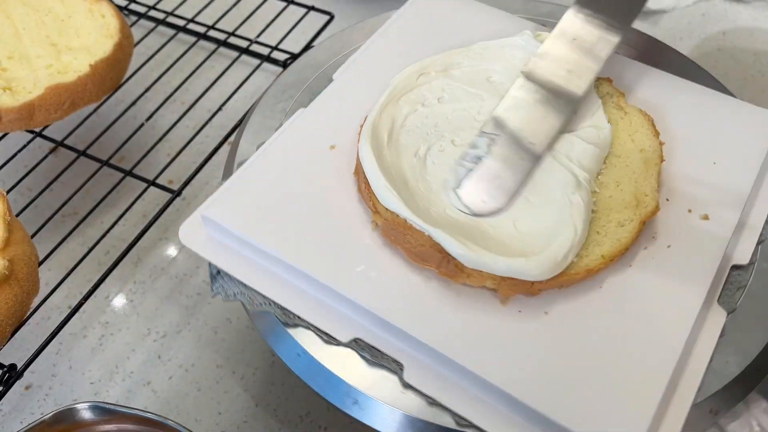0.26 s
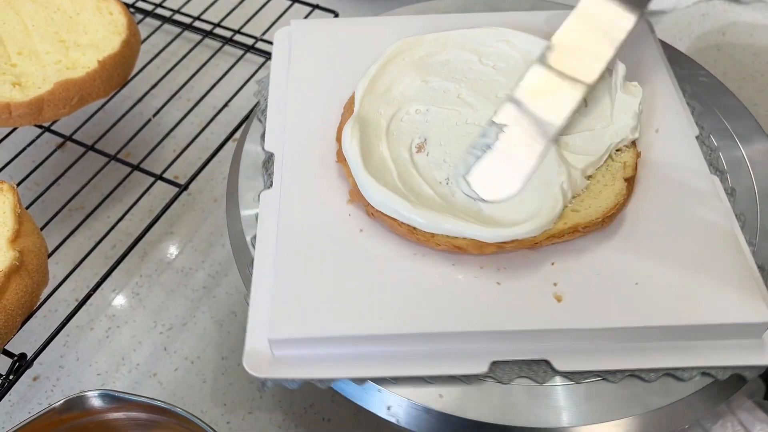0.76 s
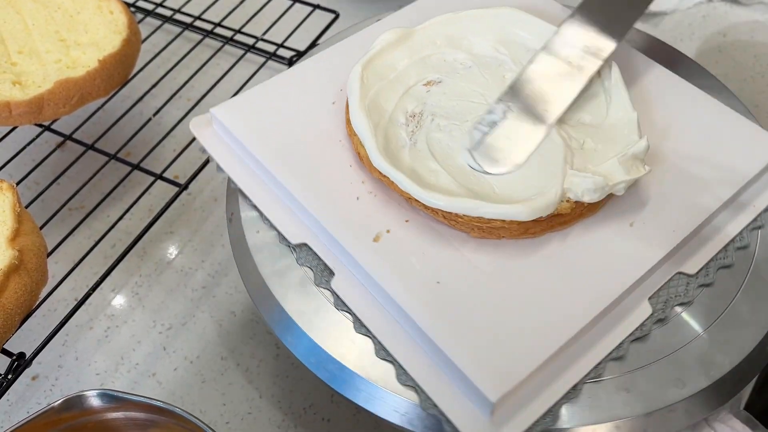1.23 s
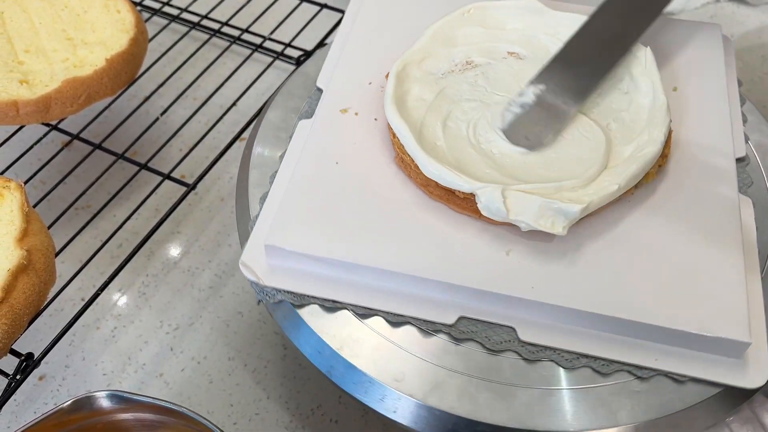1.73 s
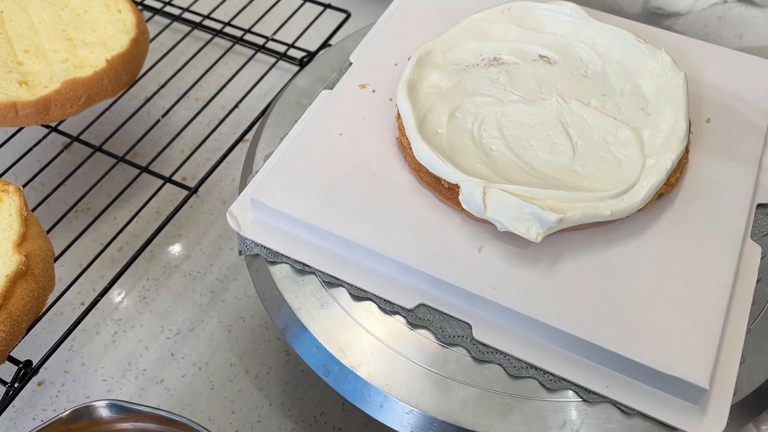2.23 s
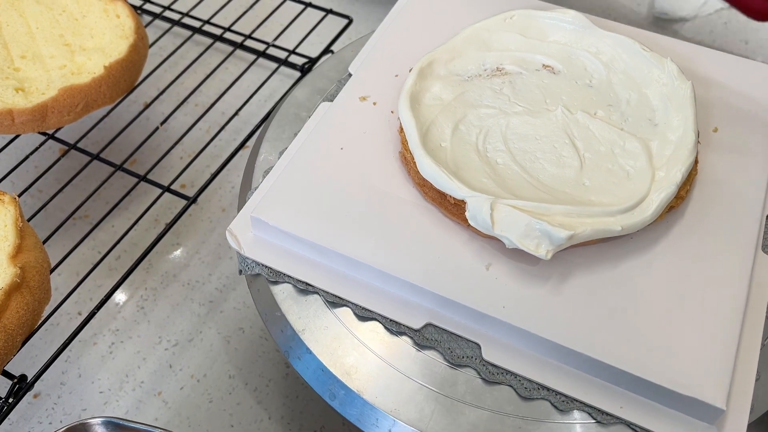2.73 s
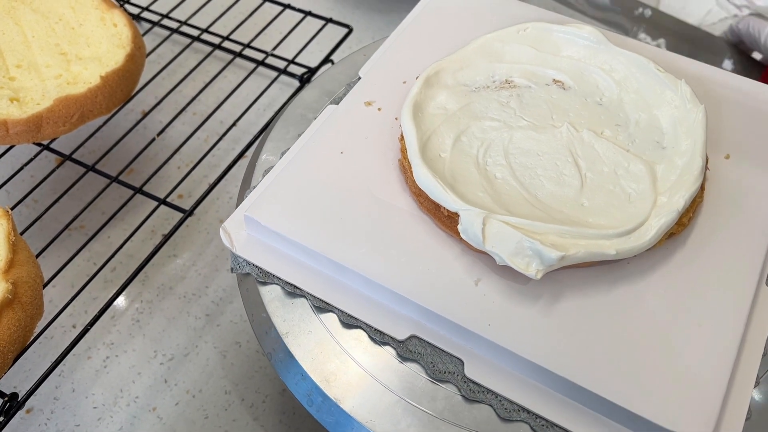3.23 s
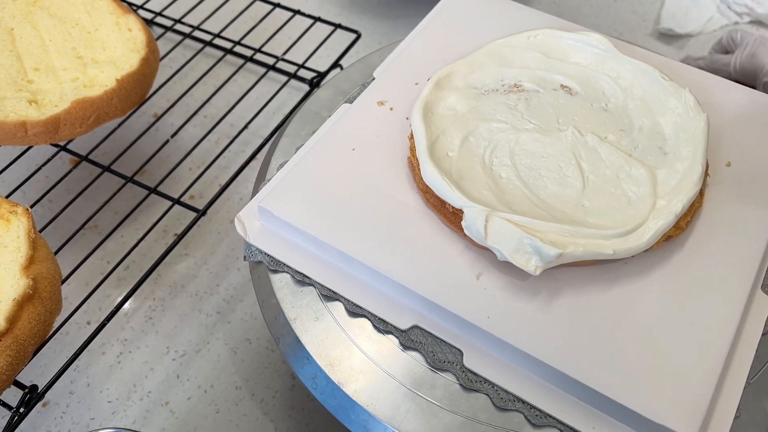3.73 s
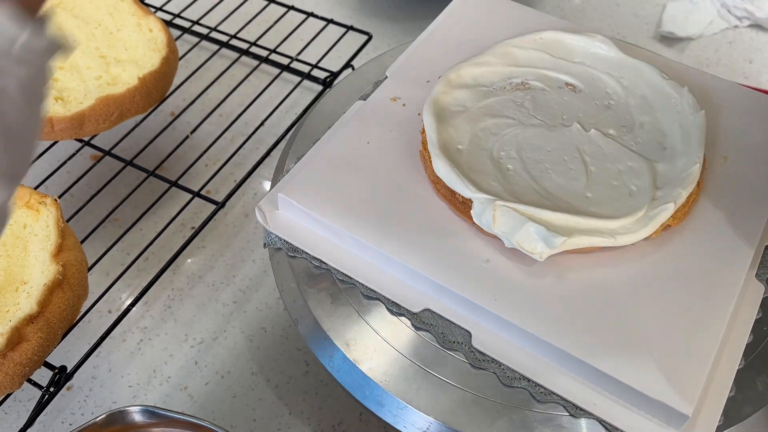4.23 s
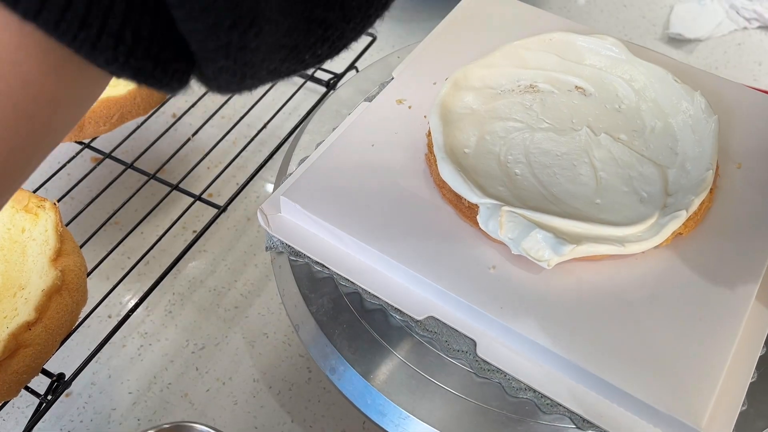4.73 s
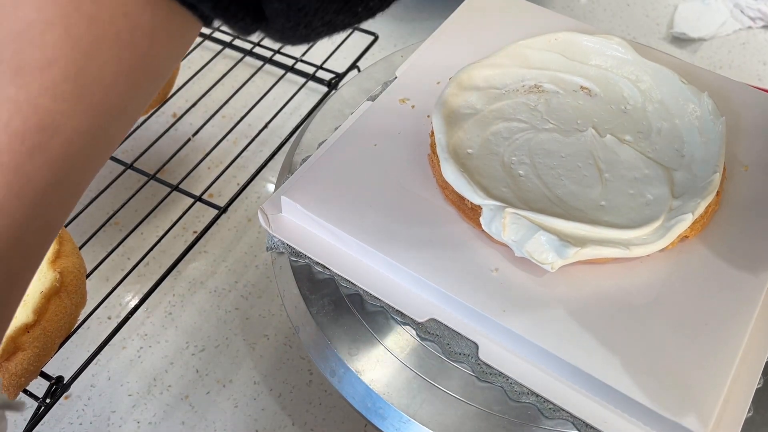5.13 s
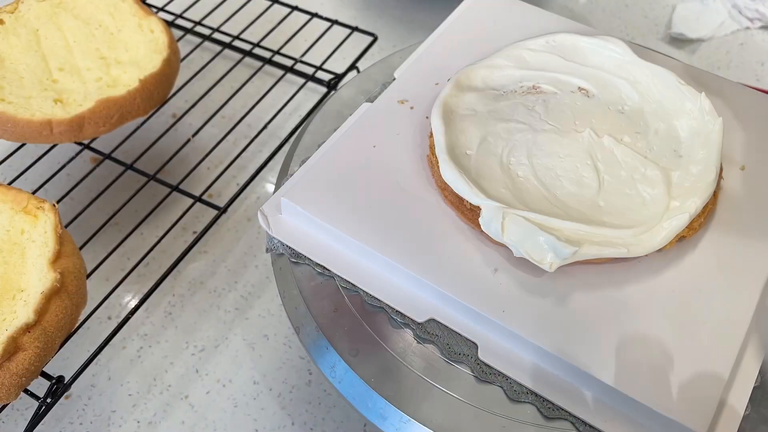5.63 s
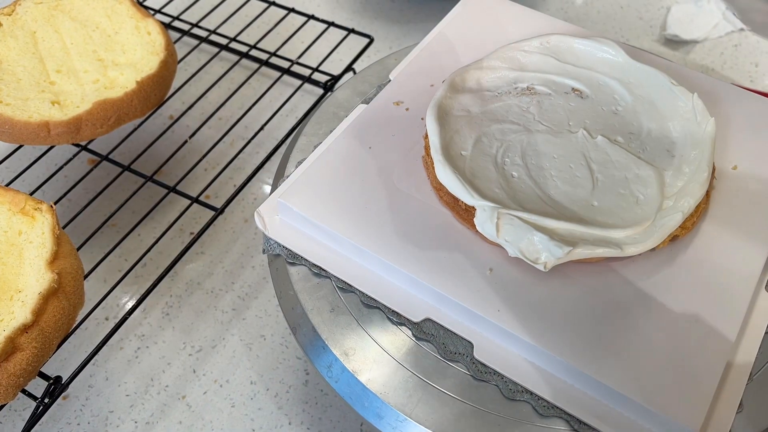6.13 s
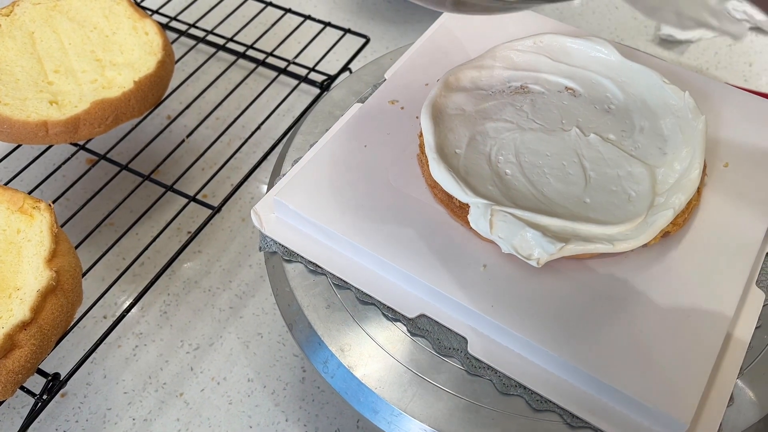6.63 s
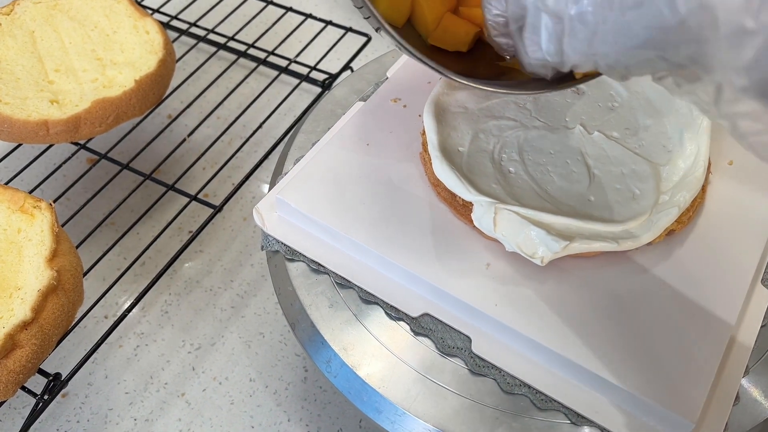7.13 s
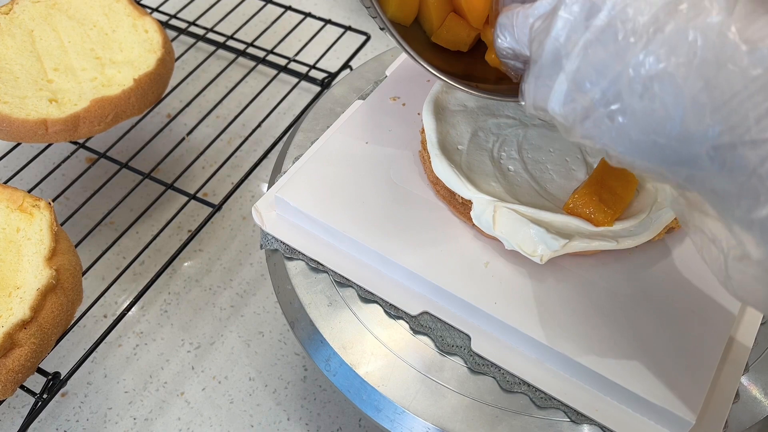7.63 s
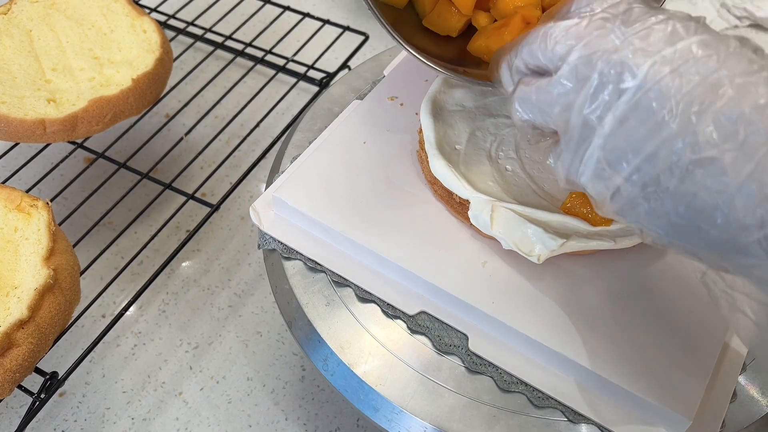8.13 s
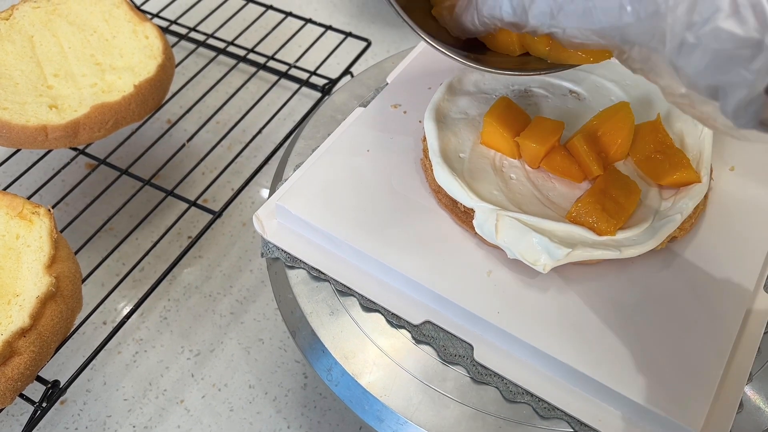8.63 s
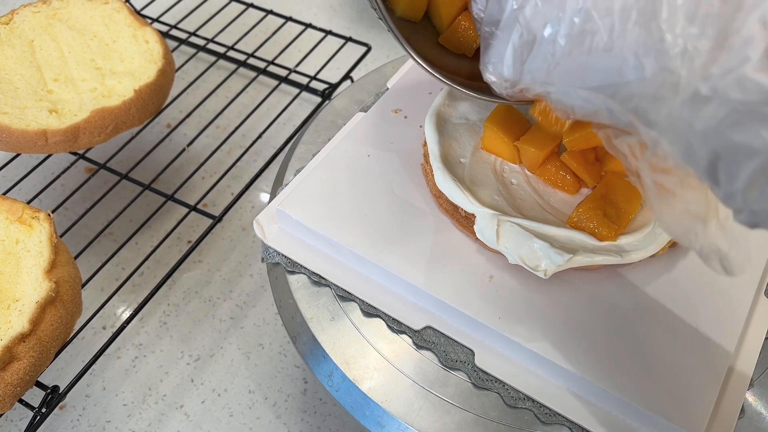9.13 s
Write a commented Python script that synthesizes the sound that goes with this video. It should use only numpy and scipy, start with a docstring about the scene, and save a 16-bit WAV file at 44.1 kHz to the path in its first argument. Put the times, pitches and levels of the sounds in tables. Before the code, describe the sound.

Close stereo microphone at a worktop, slight room and faint hiss. Rhythmic wet cream smearing comes first, then a solid counter thump, brief steel slide, bowl clank and knife clatter with skin rubbing. Small ticks, a cloth swish and dull movement rumble lead into sharp plastic film crinkling, strongest at first, then steady and finer as the gloved hand lays soft fruit on cream, with a late light clack on the bowl.

```python
"""A palette knife smears cream on a cake layer in a small kitchen: bubbly noise grains follow the pressure.
Bowl and knife are put down with knocks, contact noise over decaying modes, and a sleeve swishes past the microphone.
Then a thin plastic glove crinkles in dense random snaps as it lays soft fruit on the cream.
A close pair of microphone ports hears this with a little room, over dull movement rumble and faint hiss."""
import sys
import numpy as np
from scipy import signal
from scipy.fft import rfft, irfft, next_fast_len
from scipy.io import wavfile
from scipy.ndimage import map_coordinates

SR = 44100
rng = np.random.default_rng(int(sys.argv[2]) if len(sys.argv) > 2 else 0)


def to_wav(s):
    """Save 16-bit WAV."""
    ch = np.atleast_2d(s).T  # columns
    pcm = np.round(np.clip(ch, -1, 1) * 32767)  # PCM
    wavfile.write(sys.argv[1], SR, pcm.astype(np.int16))


N = 413658

# ringing modes of the counter: frequency_hz, relative level_db, t60_s
COUNTER_MODES = [(98, -4, 0.19), (161, 5, 0.19), (228, -0.5, 0.19), (277, -1, 0.16), (340, -13, 0.15),
                 (433, -11, 0.087), (485, -7, 0.073), (780, -17, 0.26), (906, -31, 0.15), (1972, -22, 0.28),
                 (4080, -18, 0.39)]
# colour of small hard contacts: frequency_hz, relative density_db (per Hz)
TICK_COLOUR = [(150, -14), (550, 2), (1500, -38), (2200, -2.5), (2900, 4), (4000, 10.5), (5000, 0),
               (6700, 12.5), (8300, 12), (12000, 6.5), (15800, 3)]


def amp(db):
    """Decibels to linear gain."""
    return 10 ** (np.asarray(db) / 20)


def rms(x):
    """Root mean square, kept above zero."""
    return np.sqrt(np.mean(x ** 2) + 1e-20)


def along(points, hz):
    """Interpolate (Hz, value) points on a log frequency axis."""
    f, v = np.transpose(points)
    return np.interp(np.log(hz + 1), np.log(f + 1), v)


def gains(rows):
    """One gain per sample for each dB column, fading out within 30 ms beyond the rows."""
    s, *cols = np.transpose(rows)
    t = np.arange(N) / SR
    gate = np.interp(t, [s[0] - .03, s[0], s[-1], s[-1] + .03], [0, 1, 1, 0])
    return [gate * amp(np.interp(t, s, c)) for c in cols]


def wobble(rate):
    """A random curve of straight segments, rate knots a second."""
    knots = rng.standard_normal(int(N * rate / SR) + 4)
    return map_coordinates(knots, [np.arange(N) * rate / SR], order=1)


def filtered(x, response):
    """Multiply the spectrum of x by a complex response of frequency."""
    n = x.shape[-1]
    m = next_fast_len(n + 8192, True)
    return irfft(rfft(x, m) * response(np.fft.rfftfreq(m, 1 / SR)), m)[..., :n]


def coloured(x, spectrum, size=2048):
    """Pass x through the causal filter of a spectrum, keeping the power of white noise."""
    # folding the cepstrum onto positive times gives minimum phase
    cepstrum = irfft(np.log(amp(along(spectrum, np.fft.rfftfreq(size, 1 / SR)))))
    cepstrum[1:size // 2] *= 2
    cepstrum[size // 2 + 1:] = 0
    response = irfft(np.exp(rfft(cepstrum)))
    return signal.oaconvolve(x, response / np.linalg.norm(response))[:len(x)]


def split(x, edge_hz):
    """The parts of x below and above an edge."""
    low = filtered(x, lambda hz: 1 / (1 + (hz / edge_hz) ** 4))
    return low, x - low


def add(track, s, sound):
    """Mix a sound into the track at time s."""
    part = track[max(round(s * SR), 0):][:len(sound)]
    part += sound[:len(part)]


def grains(rate, spread_db, clump_db, rub):
    """Tiny flicks of uneven size that come in clumps, over a share of smooth rubbing noise."""
    sizes = amp(spread_db * np.minimum(rng.exponential(size=N), 4))
    flicks = (rng.random(N) < rate / SR) * rng.choice([-1, 1], N) * sizes
    clumps = amp(clump_db * (wobble(250) + wobble(60)) / 2)
    x = (flicks / rms(flicks) + rub * rng.standard_normal(N)) * clumps
    return x / rms(x)


def crackle(rate, spread_db, t60):
    """Sparse ticks of uneven size, each a brief burst of decaying noise."""
    sizes = amp(spread_db * np.minimum(rng.exponential(size=N), 2.5))
    onsets = (rng.random(N) < rate / SR) * sizes
    decay = signal.lfilter([1], [1, -amp(-60 / t60 / SR)], onsets)
    return decay * rng.standard_normal(N) / 2


def patchy(x, depth_db, width_hz, life):
    """The colour shifts from moment to moment as different folds and spots sound."""
    z = signal.stft(x, nperseg=256)[2]
    across = np.arange(z.shape[0]) * SR / 256 / width_hz
    onward = np.arange(z.shape[1]) * 128 / SR / life
    where = np.meshgrid(across, onward, indexing="ij")
    field = map_coordinates(rng.standard_normal((128, 2048)), where, order=1, mode="mirror")
    return signal.istft(z * amp(depth_db * field), nperseg=256)[1][:N]


def strokes(rows, attack, slope_db, t60):
    """Gain of rubbing strokes: each rises, drifts by slope_db a second while it lasts, and dies away."""
    track, t = np.zeros(N), np.arange(SR) / SR
    for s, length, db in rows:
        drift = slope_db * np.minimum(t, length)
        release = 60 * np.maximum(t - length, 0) / t60
        add(track, s, np.minimum(t / attack, 1) * amp(db + drift - release))
    return track


def rustle(body, top, drive, spectrum, edge_hz, low_db, high_db):
    """Grains in a material's colour, with one gain for its body and one for its fine top."""
    low, high = split(coloured(drive, spectrum), edge_hz)
    return amp(low_db) * body * low / rms(low) + amp(high_db) * top * high / rms(high)


def snaps(rows, spectrum, rise, t60, after_db, after_t60, low_db):
    """Each snap is a noise burst with a quick and a slow decay; a third column shifts its low part."""
    track, t = np.zeros(N), np.arange(SR // 8) / SR
    shape = (1 - np.exp(-t / rise)) * (amp(-60 * t / t60) + amp(after_db - 60 * t / after_t60))
    for s, db, *body_db in rows:
        low, high = split(coloured(rng.standard_normal(len(t)) * shape, spectrum), 2400)
        snap = amp(sum(body_db) + low_db) * low / rms(low) + high / rms(high)
        add(track, s, amp(db) * snap / np.abs(snap).max())
    return track


def struck(blows, modes, colour, contact_t60, ring_db, trim_db, crack_db, push_db):
    """A thing scrapes into contact, takes a push, cracks, thuds in its dense resonances and rings in its modes."""
    crack_t60 = 0.011  # seconds
    track, lead = np.zeros(N), SR // 16
    t = np.arange(-lead, SR // 2) / SR
    after = np.maximum(t, 0)
    for s, db, lead_in in blows:
        scrape_and_thud = np.exp(np.minimum(t, 0) / lead_in) * amp(-60 * after / contact_t60)
        crack = (t >= 0) * amp(crack_db - 60 * after / crack_t60)
        shape = scrape_and_thud + crack
        push = (t == 0) * amp(push_db) * np.linalg.norm(shape)
        contact = coloured(rng.standard_normal(len(t)) * shape + push, colour)
        ring = np.zeros(len(t))
        for k, (hz, level, t60) in enumerate(modes):
            decay = amp(level + rng.normal(0, 1) - 60 * after / t60)
            ring += (-1) ** k * decay * np.sin(2 * np.pi * hz * after + rng.normal(0, 1.0))
        ring *= 1 - np.exp(-after / 0.0015)
        blow = contact * rms(shape) / rms(contact) + amp(ring_db) * ring
        add(track, s - lead / SR, amp(db + trim_db) * blow)
    return track


def background():
    """Dull movement rumble, brighter when the cook is brisk, over the faint hiss of the room."""
    # rumble of the cook's movements: time_s, level_db (before trim)
    rumble = [(0.0, -80), (0.8, -86), (1.2, -77), (1.9, -81), (2.7, -78), (3.5, -76), (3.97, -73.5),
              (4.2, -72), (4.6, -70), (5.0, -74), (5.17, -75), (5.4, -75), (5.58, -77), (5.65, -67),
              (5.75, -74), (5.93, -75), (6.08, -69), (6.25, -74), (6.45, -85), (6.9, -91), (7.4, -86),
              (7.58, -76), (7.75, -86), (8.1, -87), (8.55, -81), (9.38, -88)]
    # colour of the movements: frequency_hz, relative density_db (per Hz)
    shuffle_colour = [(20, -3), (50, 8), (110, -0.5), (200, -6), (400, -15), (700, -24.5), (1500, -27.5)]
    # colour of the hiss: frequency_hz, relative density_db (per Hz)
    hiss_colour = [(30, -15), (150, -6), (500, -14.5), (1500, -9.5), (4000, -10.5), (9000, -16),
                   (15800, -30)]
    motion, = gains(rumble)
    brushing = motion.max() * (motion / motion.max()) ** 2.27  # the top grows faster than the body
    sway = rng.standard_normal(N) * amp(3.2 * wobble(22))
    shuffle = rustle(motion, brushing, sway, shuffle_colour, edge_hz=140, low_db=-0.5, high_db=2.5)
    hiss = np.array([coloured(rng.standard_normal(N), hiss_colour) for side in range(2)])
    return shuffle + amp(-71.5) * hiss


def scatter(x, t60, size):
    """Dying reflections, separate at each port; their pattern is new every size samples."""
    padded = np.pad(x, (size, 2 * size))
    frames = np.lib.stride_tricks.sliding_window_view(padded, 2 * size)[::size]
    t = np.arange(2 * size) / SR
    decay = amp(-60 * t / t60) * (1 - np.exp(-t / 0.0027))
    tails = rng.standard_normal((2, len(frames), 2 * size)) * decay / np.linalg.norm(decay)
    windowed = frames * signal.windows.cosine(2 * size)
    heard = irfft(rfft(windowed, 4 * size) * rfft(tails, 4 * size))
    # overlap-add the frames
    at = np.arange(len(frames))[:, None] * size + np.arange(heard.shape[-1])
    return np.array([np.bincount(at.ravel(), port.ravel())[size:size + N] for port in heard])


def kitchen(rustles, knocks, ticks, near_t60, room_t60, room_db):
    """Direct sound, quick scatter off counter and dishes, and a room tail that the close ticks hardly reach."""
    # power that reaches the ports directly: frequency_hz, share (fraction, limited to .05 to .98)
    direct_share = [(100, .97), (300, .85), (800, .5), (2000, .4), (4500, .3), (6800, .58), (10000, .38),
                    (12000, .6), (13800, .96), (15800, .6)]
    # colour of the room tail: frequency_hz, level_db (added to room_db)
    tail_colour = [(100, 9), (500, 7.5), (4000, 11.5), (15000, 6.5)]
    share = lambda hz: np.clip(along(direct_share, hz), .05, .98)
    direct = filtered(rustles + knocks + ticks, lambda hz: np.sqrt(share(hz)))
    near = scatter(rustles + ticks, near_t60, size=128) + scatter(knocks, near_t60, size=2048)
    near = filtered(near, lambda hz: np.sqrt(1 - share(hz)))
    tail = scatter(rustles + knocks + amp(-9) * ticks, room_t60, size=8192)
    tail = filtered(tail, lambda hz: amp(room_db + along(tail_colour, hz)))
    return direct + near + tail


def fetching_bumps():
    """Soft bumps as the fruit bowl is fetched: dull contact noise and the counter's modes."""
    # bumps: time_s, level_db (before trim), lead_in_s (time constant)
    bumps = [(5.126, -54.5, 0.003), (5.178, -60, .004), (5.23, -63, 0.006), (5.622, -51, 0.0023),
             (5.64, -56, 0.0025)]
    # colour of the bumps: frequency_hz, relative density_db (per Hz)
    bump_colour = [(20, -3), (50, 8), (110, -0.5), (200, -6), (400, -15), (700, -24.5), (1500, -27.5)]
    return struck(bumps, COUNTER_MODES, bump_colour, contact_t60=0.059,
                  ring_db=-13.5, trim_db=1.5, crack_db=-17, push_db=2)


def hands():
    """Skin slides over bowl, knife and counter in clumped grains, with faint stray touches throughout."""
    # slides of the hands: start_s, length_s, level_db (before trim)
    handling = [(2.36, 0.14, -57.5), (2.575, 0.012, -56), (2.675, 0.075, -62.5), (2.81, 0.1, -61),
                (2.98, 0.15, -65), (3.16, 0.23, -62), (3.405, 0.078, -56), (3.49, 0.11, -58.5),
                (3.66, 0.13, -68.5), (3.82, 0.57, -69.5), (4.43, 0.11, -69.5), (4.59, 0.035, -71),
                (5.195, 0.029, -63.5), (5.34, 0.1, -63.5), (5.48, 0.022, -59.5)]
    # colour of sliding hands: frequency_hz, relative density_db (per Hz)
    hand_colour = [(200, -11), (600, -4), (1200, -4), (2000, 0), (2800, 3.5), (4000, -1.5), (5500, -3.5),
                   (7500, -2.5), (8400, -0.5), (9500, -3.5), (12000, -1), (15800, -15.5)]
    skin = grains(rate=3400, spread_db=-0.5, clump_db=5.5, rub=0.87)
    speed = strokes(handling, attack=0.017, slope_db=-13, t60=0.21)
    sliding = rustle(speed, speed, skin, hand_colour, edge_hz=5500, low_db=-5.0, high_db=1.5)
    touches = amp(-55) * coloured(crackle(rate=9, spread_db=2, t60=.006), hand_colour)
    return sliding + touches


def steel_slide():
    """Steel slides on steel, its gritty slips swelling as it gathers speed until it stops."""
    # slides: start_s, length_s, level_db (at the start, before trim)
    slides = [(2.36, 0.11, -55), (2.795, .022, -64), (2.912, 0.02, -48.5)]
    # colour of sliding steel: frequency_hz, relative density_db (per Hz)
    sing_colour = [(3000, -26), (7300, -18), (8000, -3), (8600, -3), (9400, -16), (13000, -25)]
    slips = grains(rate=3000, spread_db=2, clump_db=3, rub=.6)
    speed = strokes(slides, attack=0.0079, slope_db=68, t60=0.058)
    return amp(-1.0) * speed * coloured(slips, sing_colour)


def sleeve():
    """A knitted sleeve brushes past the microphone: dense, smooth fibre noise in short swishes."""
    # swishes: start_s, length_s, level_db (before trim)
    swishes = [(4.705, 0.081, -59), (4.8, 0.22, -66), (4.94, 0.091, -54)]
    # colour of the cloth: frequency_hz, relative density_db (per Hz)
    cloth_colour = [(400, -15.5), (900, -12), (1600, -5.5), (2500, -2), (3400, 4.5), (5000, -2.5),
                    (7000, -1.5), (10000, -4), (15800, -14.5)]
    wool = coloured(grains(rate=9000, spread_db=1, clump_db=.8, rub=2.2), cloth_colour)
    return amp(3.0) * strokes(swishes, attack=0.02, slope_db=0, t60=0.094) * wool


def bowl_put_down():
    """The bowl thumps on the counter and clanks, each with its own contact noise and modes."""
    # blows on the counter: time_s, level_db (before trim), lead_in_s (time constant)
    counter_blows = [(2.334, -50.5, 0.0034), (2.361, -37, 0.013), (2.367, -28, 0.00082),
                     (2.497, -52, 0.0044), (2.941, -48.5, 0.0051)]
    # blows on the bowl: time_s, level_db (before trim), lead_in_s (time constant)
    bowl_blows = [(2.807, -34.5, 0.0069), (2.818, -38, 0.0038), (2.938, -56, 0.025)]
    # ringing modes of the bowl: frequency_hz, relative level_db, t60_s
    bowl_modes = [(163, -15, 0.17), (191, -4, 0.13), (405, -5, 0.087), (438, -1, 0.14), (483, 8, 0.1),
                  (636, -14, .15), (850, -6, 0.1), (945, -7, 0.081), (1260, -15, 0.11), (1370, -12.5, 0.22),
                  (1960, -14, .16), (2340, -10, 0.072), (2500, -1, 0.11), (2464, -3, 0.083),
                  (3480, -11, .08), (3760, -11, 0.08), (4300, -13, .08), (6966, -15, .07)]
    # colour of the thump: frequency_hz, relative density_db (per Hz)
    thump_colour = [(50, -16), (100, -9), (160, 0), (280, 5), (345, 4), (440, 7), (600, -10), (950, -11),
                    (1500, -27.5), (2000, -21), (3000, -28), (8000, -36), (15800, -49)]
    # colour of the clank: frequency_hz, relative density_db (per Hz)
    clank_colour = [(80, -20), (200, -7), (320, -15), (450, -2), (560, -14), (680, -20), (900, -11.5),
                    (1120, -26), (1330, -15), (1650, -31), (2100, -18), (2400, -9), (2750, -24),
                    (3600, -16.5), (4400, -16.5), (6200, -22.5), (8000, -20), (15800, -21)]
    thump = struck(counter_blows, COUNTER_MODES, thump_colour, contact_t60=0.05,
                   ring_db=-12.5, trim_db=-1, crack_db=-17, push_db=0)
    clank = struck(bowl_blows, bowl_modes, clank_colour, contact_t60=0.08,
                   ring_db=-8, trim_db=0.5, crack_db=-20, push_db=-15)
    return thump + clank


def knife_put_down():
    """The knife knocks the board and clatters down; board and blade each ring in their modes."""
    # blows on the board: time_s, level_db (before trim), lead_in_s (time constant)
    board_blows = [(3.2735, -41, 0.0004), (3.659, -44.5, .0015)]
    # blows on the blade: time_s, level_db (before trim), lead_in_s (time constant)
    blade_blows = [(3.637, -49, 0.0054), (3.66, -43.5, 0.0058), (3.671, -41, 0.0026), (3.681, -44, 0.0022),
                   (3.693, -58, .002), (3.707, -57, .002)]
    # ringing modes of the board: frequency_hz, relative level_db, t60_s
    board_modes = [(103, 2.5, 0.28), (261, 6.5, 0.19), (455, 3, 0.36), (540, 7, 0.18), (623, 3, 0.14),
                   (780, 6, 0.15), (955, -6, 0.3), (1030, 3, 0.19), (1240, -6, 0.26), (1310, -2, .15),
                   (1410, 0, 0.11), (1830, -3, 0.1), (1920, 3, 0.15), (2466, 3, 0.08)]
    # ringing modes of the blade: frequency_hz, relative level_db, t60_s
    blade_modes = [(101, -2, 0.23), (238, 3.5, 0.14), (484, 6.5, 0.12), (783, -7, 0.29), (925, 2, 0.13),
                   (975, 4, 0.16), (1200, -4, 0.13), (3720, -10, 0.22), (3930, -4, .12), (4383, 4, 0.13),
                   (4438, 1, .15), (4469, 2, 0.15), (4678, 4, 0.16), (4700, -1, 0.17), (5626, -14, 0.22),
                   (6681, -2, 0.098), (7600, -6, .12)]
    # colour of the knock: frequency_hz, relative density_db (per Hz)
    knock_colour = [(60, -23), (110, -6), (280, 4.5), (750, 4), (1050, 0.5), (1400, 1), (1700, -11),
                    (1920, -10), (2200, -19), (2480, -4.5), (2750, -21), (3300, -24), (8000, -25),
                    (15800, -43)]
    # colour of the clatter: frequency_hz, relative density_db (per Hz)
    clatter_colour = [(60, -9), (110, -9), (240, -14), (500, -2), (700, 2.5), (1000, -3), (1700, -10),
                      (2400, -15), (3200, -11), (4500, -1), (5500, -10.5), (7500, -9), (11000, -10),
                      (15800, -19)]
    knock = struck(board_blows, board_modes, knock_colour, contact_t60=.15,
                   ring_db=-14, trim_db=0.5, crack_db=6, push_db=-14)
    clatter = struck(blade_blows, blade_modes, clatter_colour, contact_t60=0.089,
                     ring_db=-11.5, trim_db=1.5, crack_db=-13, push_db=-23)
    return knock + clatter


def bowl_wall_clacks():
    """Light things clack on the bowl's wall, which rings briefly in its high modes."""
    # blows on the wall: time_s, level_db, lead_in_s (time constant)
    wall_blows = [(4.0533, -42, .0003), (9.113, -36, .004)]
    # ringing modes of the wall: frequency_hz, relative level_db, t60_s
    wall_modes = [(2250, 1, .04), (2480, -1, .035), (3900, 3, .028), (4150, 0, .025), (6500, -3, .025),
                  (7700, -1, .025)]
    return struck(wall_blows, wall_modes, TICK_COLOUR, contact_t60=.028,
                  ring_db=-2, trim_db=0, crack_db=-8, push_db=-20)


def utensil_ticks():
    """Light ticks of utensils close to the microphone: very short bright bursts."""
    # ticks: time_s, peak_db (before trim)
    tick_times = [(2.3234, -45.5), (2.4937, -35), (2.5873, -48), (2.6878, -54), (2.924, -37.5),
                  (2.9377, -40), (3.0934, -47), (3.8267, -51), (3.924, -51), (4.012, -61), (4.0532, -33.5),
                  (4.1498, -41.5), (4.242, -50.5), (4.302, -53), (4.3116, -52), (4.376, -58), (5.123, -55),
                  (5.178, -58), (5.269, -51), (5.2829, -49), (5.385, -52), (5.485, -54), (5.496, -43),
                  (5.513, -43)]
    return amp(6) * snaps(tick_times, TICK_COLOUR, rise=.0002, t60=.0045, after_db=-30, after_t60=.03, low_db=-9)


def squelches():
    """Cream and fruit squelch: a cluster of small wet cavities opens, each ringing for a few cycles."""
    # squelches: time_s, level_db, pitch_hz (centre of an octave of cavities), length_s (spread of onsets)
    wet_spots = [(0.653, -62, 990, 0.055), (0.719, -72, 1380, 0.03), (1.189, -58, 1700, 0.021),
                 (1.393, -59, 1040, 0.011), (1.445, -47.5, 1210, 0.0054), (1.558, -55, 1550, 0.0087),
                 (1.578, -58, 1560, 0.023), (4.076, -62.5, 1240, 0.022), (4.096, -67, 730, .04),
                 (7.68, -53, 1890, 0.021), (7.771, -54, 1050, 0.0112), (9.205, -57, 835, 0.016)]
    track, t = np.zeros(N), np.arange(SR // 10) / SR
    for s, db, pitch_hz, length in wet_spots:
        start, detune, size = rng.random((3, 14, 1))  # 14 cavities
        hz = pitch_hz * 2 ** (detune - .5)
        cycles = hz * np.maximum(t - (start - start.min()) * length, 0)
        envelope = cycles ** 2 * np.exp(-cycles / 0.57)
        cluster = np.sum(size * np.sin(2 * np.pi * cycles) * envelope, axis=0)
        add(track, s, amp(db) * cluster / np.sqrt(np.sum(cluster ** 2) / (length * SR)))
    return track


def hollows():
    """Pockets of air between glove, fruit and bowl ring at their own pitches, driven by random film flips."""
    # hollows: start_s, length_s, level_db (before fading in and out), pitch_hz, sharpness_q (no unit)
    pockets = [(7.039, 0.084, -55, 1490, 4.3), (7.342, 0.19, -66, 1630, 4.4), (7.528, .03, -55.5, 1540, 9),
               (7.582, 0.097, -72, 3100, 4), (7.682, 0.055, -59, 2200, 4), (7.771, 0.1, -57, 765, 3.9),
               (7.84, 0.13, -62, 660, 3.1), (8.09, 0.12, -64.5, 757, 9.7), (8.208, 0.12, -63, 1100, 4),
               (8.467, 0.2, -56, 1380, 7.3), (8.702, .12, -66, 755, 5.8), (8.859, 0.096, -60, 820, 4),
               (9.041, 0.071, -65.5, 690, 5.6), (9.149, 0.087, -58, 790, 7), (9.3, .075, -62.5, 710, 3.7)]
    flips_per_s = 1200
    track, t = np.zeros(N), np.arange(SR // 2) / SR
    for s, length, db, pitch_hz, q in pockets:
        flips = rng.standard_normal(len(t)) * (rng.random(len(t)) < flips_per_s / SR)
        cavity = signal.iirpeak(pitch_hz, q, SR)
        ring = signal.lfilter(*cavity, signal.lfilter(*cavity, flips))
        fade = np.abs(np.sin(np.pi * np.minimum(t / length, 1))) ** .5
        add(track, s, amp(db) * ring / rms(ring[t < length]) * fade)
    return track


def glove():
    """Thin film slides over itself while countless creases flip, shifting in colour; its slack flaps dully."""
    # the gloved hand at work: time_s, film_db (flexing body), crinkle_db (fine top), both before trim
    flexing = [(5.54, -76, -90), (5.56, -62, -57), (5.6, -56, -42.5), (5.62, -48.5, -38.5),
               (5.67, -51.5, -44), (5.77, -61, -49), (5.79, -52, -43), (5.88, -55.5, -46.5),
               (5.98, -64.5, -55.5), (6.04, -56, -46), (6.083, -54, -44), (6.11, -49.5, -38),
               (6.17, -43.5, -36.5), (6.21, -50.5, -42), (6.28, -49.5, -42), (6.36, -49, -38),
               (6.44, -50, -43.5), (6.5, -51.5, -43), (6.58, -57, -48), (6.67, -49.5, -44.5),
               (6.79, -49.5, -45.5), (6.91, -58, -48.5), (7.01, -50.5, -46), (7.08, -48, -42.5),
               (7.2, -57, -52.5), (7.27, -52, -48), (7.31, -55, -51), (7.38, -52.5, -46),
               (7.47, -54, -52.5), (7.56, -53.5, -51.5), (7.63, -53.5, -53.5), (7.75, -56.5, -50.5),
               (7.84, -56, -45.5), (7.91, -55.5, -47.5), (7.95, -55.5, -46), (8.03, -61.5, -51),
               (8.12, -55, -45), (8.2, -55.5, -47), (8.25, -52, -44), (8.34, -58, -49.5), (8.43, -56, -47),
               (8.54, -47, -39), (8.61, -51, -44.5), (8.75, -51, -45.5), (8.8, -53, -46.5),
               (8.91, -53, -47), (8.96, -57.5, -49.5), (9.08, -56.5, -53.5), (9.2, -55.5, -49),
               (9.38, -58, -51.5)]
    # loudest creases that buckle: time_s, peak_db, low_part_db (shift before trim)
    creases = [(5.5657, -34, -19), (5.7785, -25, -18.5), (6.0003, -27, -18), (6.019, -25.5, -21),
               (6.041, -27, -18), (6.058, -26, -16), (6.0881, -17.5, -18.5), (6.296, -26, -14),
               (6.3509, -21.5, -14), (6.381, -24, -19), (7.439, -29, -11.5), (7.6838, -25, -10),
               (7.705, -31.5, -8), (7.773, -27, -9), (7.805, -36, -12), (7.99, -29, -9.5), (8.0, -29, -19),
               (8.009, -29, -19), (8.0456, -25.5, -23), (8.367, -28, -11), (8.376, -27.5, -11),
               (8.384, -31, -9), (8.458, -25.5, -12), (8.467, -25, -11), (9.2618, -28.5, -15)]
    # slack flapping as the glove is pulled on and the hand opens: start_s, length_s, level_db
    slack_flaps = [(5.61, 0.12, -61.5), (5.75, 0.16, -64), (6.07, 0.092, -57), (6.2, 0.17, -66),
                   (8.36, 0.297, -71.5), (8.84, 0.036, -70)]
    # colour of the film: frequency_hz, relative density_db (per Hz)
    film_colour = [(200, -28), (400, -22), (540, -13.5), (740, -2.2), (1100, -10.5), (1420, -3.5),
                   (1750, -5.5), (2200, -2.5), (2750, -3), (3200, 0), (4000, -0.5), (4900, -1.5),
                   (7500, 1.5), (11000, 6), (13500, 2.5), (15800, 4.5)]
    # colour of the slack: frequency_hz, relative density_db (per Hz)
    slack_colour = [(100, -14), (220, -2), (450, -1), (700, -5.5), (1100, -0.5), (1800, -21), (5000, -42)]
    folds = grains(rate=4200, spread_db=3.3, clump_db=1.7, rub=0.3)
    folds += amp(8.5) * crackle(rate=230, spread_db=1.7, t60=.0012)
    folds = patchy(folds / rms(folds), depth_db=1.8, width_hz=380, life=.04)
    film, fine = gains(flexing)
    crinkle = rustle(film, fine, folds, film_colour, edge_hz=4060, low_db=-0.3, high_db=2.5)
    buckles = snaps(creases, film_colour, rise=.0003, t60=.009, after_db=-14, after_t60=.06, low_db=3)
    slack = coloured(grains(rate=600, spread_db=3, clump_db=1, rub=0.34), slack_colour)
    flaps = strokes(slack_flaps, attack=0.011, slope_db=0, t60=0.14) * slack
    return crinkle + hollows() + buckles + flaps


def cream():
    """The blade tears loose and smears whipped cream, whose small bubbles burst; strays pop at a light touch."""
    # strokes of the knife: start_s, length_s, pressure_db (before trim)
    spread = [(0.0, 0.047, -58), (0.083, 0.072, -55.5), (0.19, 0.12, -56.5), (0.346, 0.057, -55.5),
              (0.43, 0.14, -60), (0.595, 0.062, -56.5), (0.66, 0.082, -58), (0.8, 0.043, -70),
              (0.848, 0.071, -55.5), (0.945, 0.023, -56.5), (1.088, 0.066, -56), (1.17, 0.089, -58.5),
              (1.315, 0.081, -56), (1.41, 0.12, -57), (1.56, 0.044, -54), (1.65, 0.086, -64),
              (1.78, 0.054, -59), (1.885, 0.067, -63.5), (2.02, 0.56, -75)]
    # blade tearing loose as a stroke begins: time_s, peak_db
    tear_times = [(0.083, -39.5), (0.346, -37.5), (0.356, -47), (0.854, -38.5), (1.089, -39.5),
                  (1.316, -46)]
    # loudest air pockets that pop: time_s, peak_db (before trim)
    pop_times = [(0.4578, -30.5), (0.521, -35.5), (0.7238, -30), (0.732, -33), (0.7845, -34),
                 (1.0205, -35.5), (1.131, -33), (1.1965, -33.5), (1.255, -50), (1.379, -29), (1.394, -30.5),
                 (1.4486, -32), (1.5838, -33), (1.718, -38.5), (1.8308, -44), (1.837, -34.5), (1.912, -31),
                 (1.9463, -34.5), (1.954, -39.5), (2.0612, -43), (2.134, -43), (2.173, -41.5)]
    # colour of the cream: frequency_hz, relative density_db (per Hz)
    cream_colour = [(150, -9.5), (350, -8.5), (600, -8.5), (900, -3), (1400, -5.5), (1900, 0), (2600, 3.5),
                    (3600, 0), (5000, 0.5), (7000, 3.5), (10000, 5.5), (13000, 1), (15800, -4)]
    bubbles = grains(rate=7800, spread_db=6.5, clump_db=1.5, rub=0.8)
    bubbles = patchy(bubbles, depth_db=.9, width_hz=800, life=.035)
    bubbles += amp(6.0) * crackle(rate=59, spread_db=3.5, t60=0.006)
    pressure = strokes(spread, attack=0.0074, slope_db=-3.5, t60=0.17)
    effort = pressure / pressure.max()
    body = pressure.max() * effort ** 2.06  # the smear grows faster with pressure than the fizz
    smear = rustle(body, pressure, bubbles, cream_colour, edge_hz=2500, low_db=-6.0, high_db=2.0)
    stray_pops = coloured(crackle(rate=28, spread_db=2.5, t60=.012), cream_colour)
    strays = amp(-46) * effort ** .3 * stray_pops
    tears = snaps(tear_times, cream_colour, rise=.005, t60=.045, after_db=-19, after_t60=.08, low_db=-8)
    pops = snaps(pop_times, cream_colour, rise=.0006, t60=.008, after_db=-22, after_t60=.05, low_db=-11)
    return smear + strays + tears + amp(-3.5) * pops


def scene():
    """Everything at the worktop is heard through the kitchen; the background is added at the ports."""
    rustles = cream() + glove() + hands() + steel_slide() + sleeve() + fetching_bumps()
    knocks = bowl_put_down() + knife_put_down() + bowl_wall_clacks() + squelches()
    heard = kitchen(rustles, knocks, utensil_ticks(), near_t60=.013, room_t60=.3, room_db=-14)
    return heard + background()


def record(dry):
    """The two microphone ports differ in phase and level; nothing passes above the band limit."""
    # phase between the ports: frequency_hz, left_lead_rad
    port_phase = [(100, 0), (800, -1.1), (1500, -.4), (3000, -1.7), (4600, -2.2), (5800, 0), (7200, -.2),
                  (10000, -1.4), (12500, -2.9), (14000, -3.14), (15800, -3)]
    # level between the ports: frequency_hz, left_minus_right_db
    port_balance = [(150, 0), (400, -1.5), (650, -6.5), (1100, -8), (1600, -5.5), (2500, -1.2), (5000, 0)]
    top_hz = 15950
    half = np.array([[.5], [-.5]])  # each port takes half the difference

    def ports(hz):
        level = amp(half * along(port_balance, hz))
        return level * np.exp(1j * half * along(port_phase, hz))

    return filtered(dry, lambda hz: ports(hz) * (hz < top_hz))


dry = scene()
out = record(dry)
to_wav(out)
```